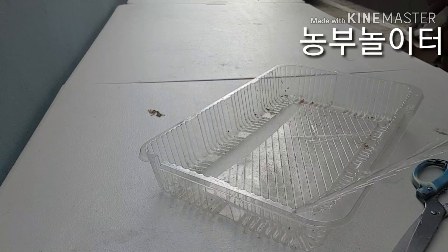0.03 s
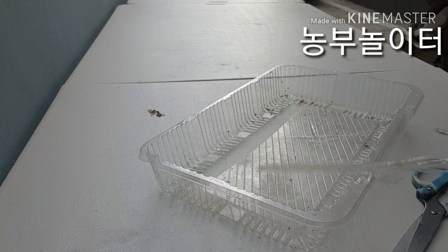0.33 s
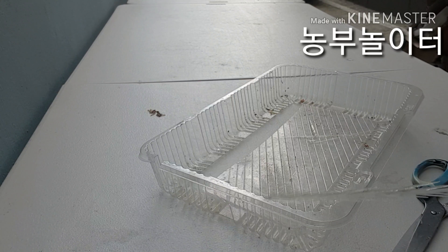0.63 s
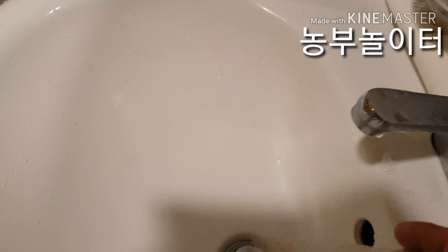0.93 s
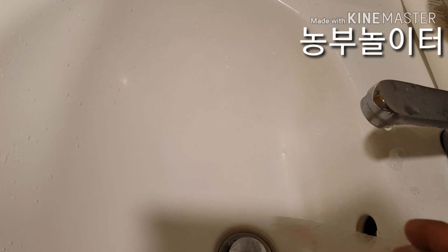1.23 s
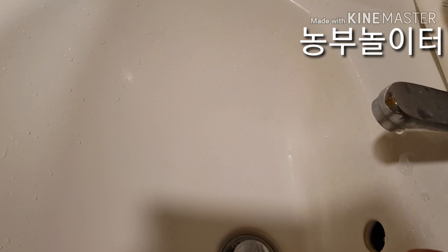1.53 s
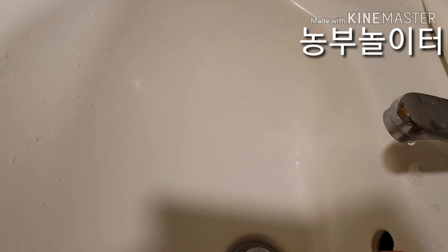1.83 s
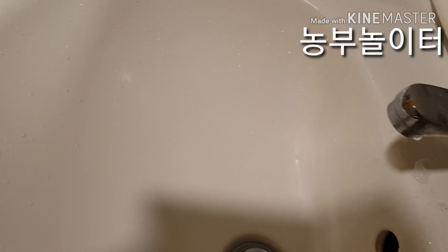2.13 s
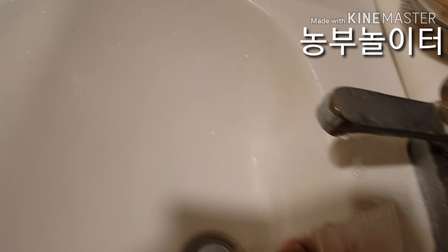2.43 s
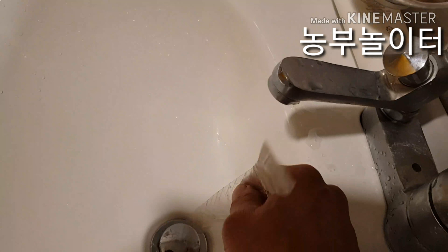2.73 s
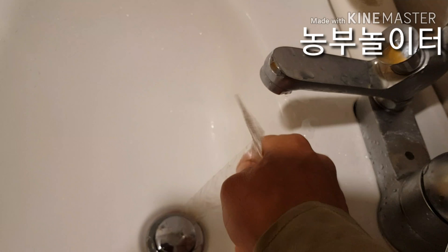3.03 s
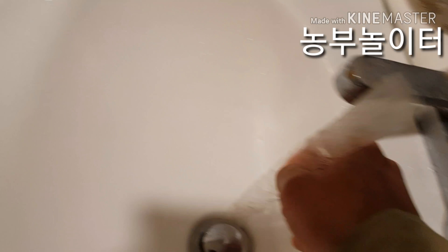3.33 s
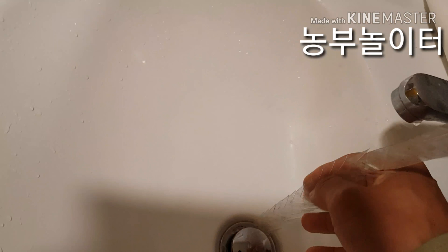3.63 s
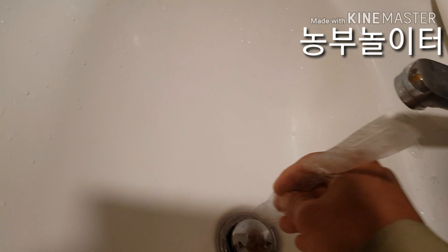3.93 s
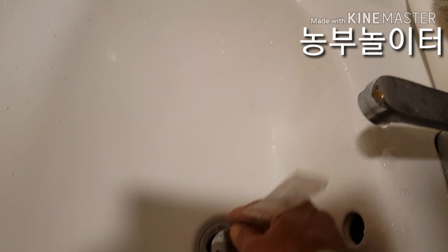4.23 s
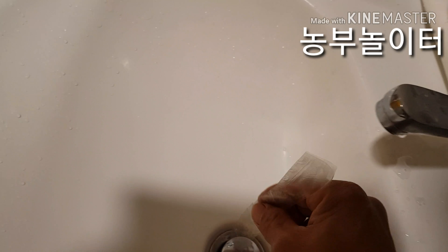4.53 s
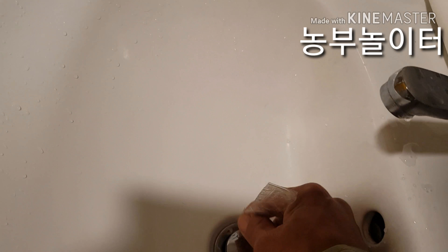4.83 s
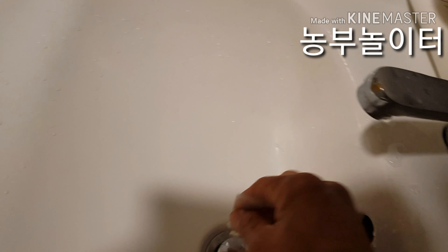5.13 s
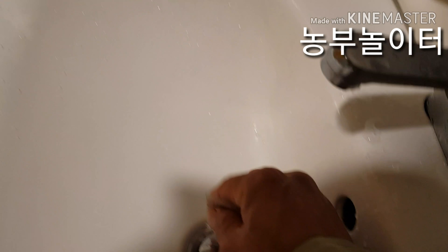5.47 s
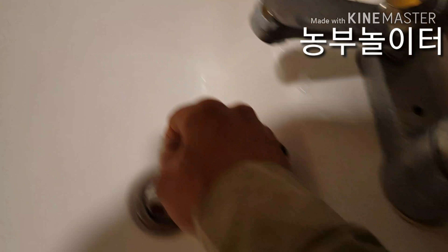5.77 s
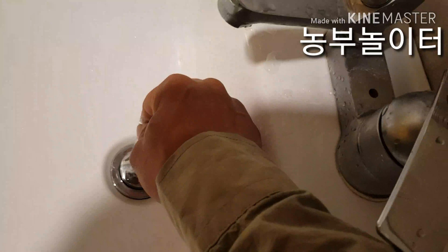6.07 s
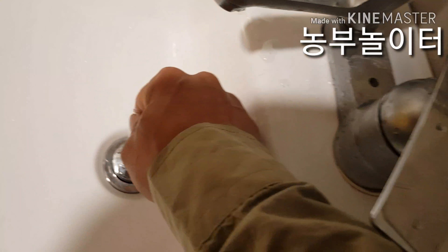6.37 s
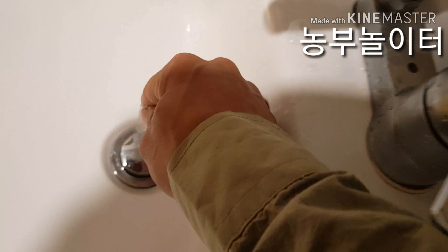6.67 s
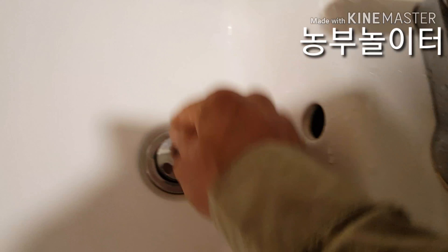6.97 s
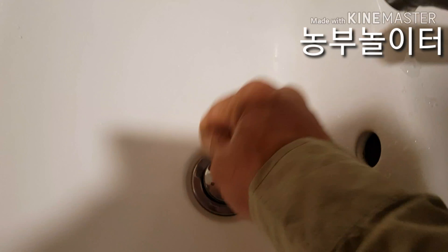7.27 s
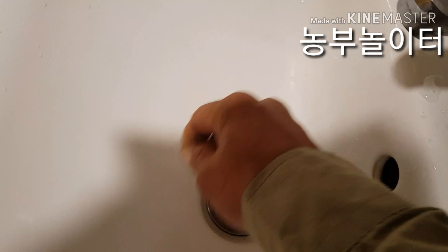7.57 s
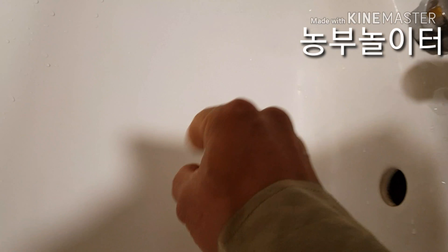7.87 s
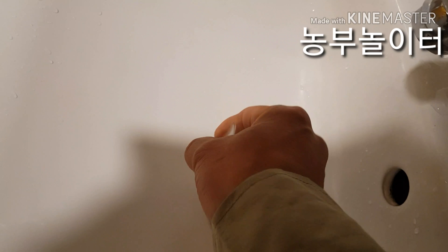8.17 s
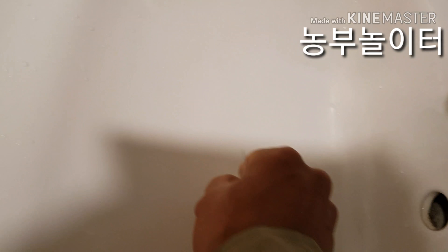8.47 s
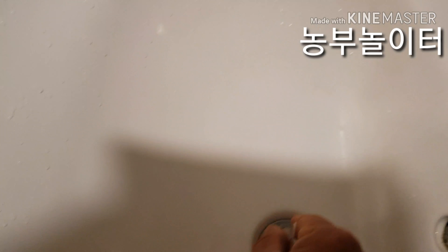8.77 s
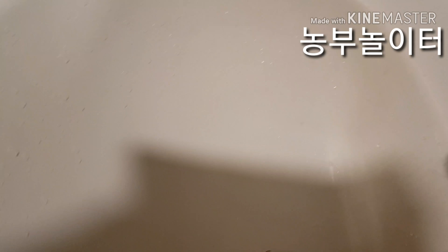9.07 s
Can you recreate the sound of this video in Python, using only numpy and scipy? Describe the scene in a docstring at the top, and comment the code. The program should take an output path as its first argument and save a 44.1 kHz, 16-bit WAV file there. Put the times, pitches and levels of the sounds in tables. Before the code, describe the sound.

A loud low rumble opens and cuts off. After a short silence, a fan hums in a small tiled bathroom while a plastic strip is worked in the sink drain, rubbing, ticking and pinging the metal stopper. A hand softly bumps the close microphone, and the pipe booms once. Later a run of hard scrapes and clacks rings the basin, and a soft swish ends it.

```python
"""A loud low rumble opens the scene and is cut off. After a short silence a fan hums in a small tiled
bathroom, where a plastic strip is worked in the washbasin drain: it rubs, its barbs scrape and tick,
the metal stopper pings, and the moving hand adds soft bumps. At 4.4 s the pipe booms once.
From 6.8 s a run of hard scrapes and clacks against the stopper rings the basin.
At 9.1 s a soft swish ends it."""
import sys
import numpy as np
from scipy import signal
from scipy.fft import rfft, irfft
from scipy.io import wavfile

SR = 44100
rng = np.random.default_rng(int(sys.argv[2]) if len(sys.argv) > 2 else 0)


def generate_wav(signal):
    """Clip the signal to [-1, 1] and save it as 16-bit WAV at the path in sys.argv[1]."""
    frames = np.transpose(np.atleast_2d(signal))
    scaled = np.clip(frames, -1, 1) * 32767
    pcm = np.round(scaled).astype(np.int16)
    wavfile.write(sys.argv[1], SR, pcm)


N = 410130
TIME = np.arange(N) / SR


def amp(db):
    """Decibels to gain."""
    return 10 ** (np.asarray(db) / 20)


def unit(x):
    """Scales to rms 1."""
    return x / np.sqrt(np.mean(x ** 2) + 1e-20)


def unit_energy(response):
    """Scales a stereo impulse response to mean channel energy 1."""
    return unit(response) / np.sqrt(response.shape[1])


def lookup(points, hz):
    """Interpolates a table on a log-frequency axis."""
    f, value = np.transpose(points)
    return np.interp(np.log(hz + 1), np.log(f + 1), value)


def add(mix, start_s, sound):
    """Mixes in a stereo sound."""
    part = mix[:, round(start_s * SR):][:, :sound.shape[1]]
    part += sound[:, :part.shape[1]]


def pan(db):
    """Stereo gains for a left-minus-right (L-R) level."""
    gains = amp(np.array([db, -db]).reshape(2, -1) / 2)
    return gains / np.sqrt(np.mean(gains ** 2, axis=0))


def drift(hz):
    """Random wander of rms 1 and bandwidth hz."""
    t = TIME[::64]
    lowpass = np.exp(-(np.fft.rfftfreq(len(t), t[1]) / hz) ** 2)
    slow = irfft(rfft(rng.standard_normal(len(t))) * lowpass, len(t))
    return np.interp(TIME, t, unit(slow))


def envelope(start_s, attack_s, hold_s, fade_db_per_s):
    """Smooth attack, hold, exponential fade."""
    t = TIME - start_s
    attack = np.sin(np.pi / 2 * np.clip(t / attack_s, 0, 1)) ** 2
    return attack * amp(-fade_db_per_s * np.maximum(t - attack_s - hold_s, 0))


def arch(middle_s, length_s):
    """Parabola from 0 to 1 and back, like the speed of one hand move."""
    return np.maximum(1 - (2 * (TIME - middle_s) / length_s) ** 2, 0)


def convolve(x, response):
    """Applies a stereo impulse response."""
    return signal.oaconvolve(np.atleast_2d(x), response, axes=1)[:, :x.shape[-1]]


# Left-right coherence: f/Hz, correlation
COHERENCE = [(60, 0.98), (150, 0.92), (300, 0.87), (600, 0.56), (1200, 0.048), (2500, 0.065), (6000, 0.052),
             (16000, 0.13)]

def colour(x, spectrum, balance, peaks=()):
    """Gives a stereo pair a spectrum, balance and resonances; the bass is nearly mono."""
    size = x.shape[1]
    hz = np.fft.rfftfreq(size, 1 / SR)
    common, separate = rfft(x)
    coherence = lookup(COHERENCE, hz)
    left = coherence * common + np.sqrt(1 - coherence ** 2) * separate
    peaks_db = sum(db / (1 + (2 * (hz - f) / width_hz) ** 2) for f, width_hz, db in peaks)
    gain = amp(lookup(spectrum, hz) + peaks_db) * pan(lookup(balance, hz))
    return irfft(np.array([left, common]) * gain, size)


def noise(spectrum, balance, peaks=()):
    """Coloured stereo noise of rms 1."""
    return unit(colour(rng.standard_normal((2, N)), spectrum, balance, peaks))


# Rumble spectrum: f/Hz, level/dB (table levels are relative throughout)
RUMBLE_SPECTRUM = [(20, -36.5), (40, -1), (60, -2), (100, -5), (170, -7), (250, -9), (400, -14),
                   (650, -19.5), (1100, -21.5), (1850, -26.5), (2600, -33.5), (3300, -40.5), (8000, -44),
                   (16000, -58)]
# Rumble resonances: f/Hz, width/Hz, boost/dB
RUMBLE_PEAKS = [(56.6, 8.8, 8.2), (95.4, 14, 11.7), (126, 4.6, 2.6), (162.3, 20, 9), (450, 25, 1.8),
                (1300, 120, 2), (2465, 45, 6.7)]

def rumble():
    """Heavy rumble with a brief hiss, a whine that fades and returns, and a late thin band."""
    balance = [(60, -3.5), (400, -4.5), (8000, -4)]
    low = amp(-22) * noise(RUMBLE_SPECTRUM, balance, RUMBLE_PEAKS) * amp(drift(hz=9.8))
    hiss = noise([(1000, -1.5), (3500, -10), (5000, -13), (8000, -15.5), (16000, -14.5)], balance,
                 peaks=[(4860, 300, 5.3), (6980, 600, 5.8)])
    whine = noise([(900, -31), (1300, -18), (1850, -11), (2300, -22.5), (3000, -44)], balance,
                  peaks=[(1860, 38, 4.9), (1680, 95, 6.2), (1240, 85, 13)])
    thin = noise([(2400, -45), (3050, 1), (3300, 7), (3900, -45)], balance)
    spurt = amp(-32.5) * envelope(0.05, attack_s=0.076, hold_s=0.005, fade_db_per_s=129)
    hiss *= spurt + amp(-37.5 - 17.3 * TIME)
    opening = amp(-37.5) * envelope(0, attack_s=0.005, hold_s=0.36, fade_db_per_s=77)
    comeback = amp(-40.5) * arch(middle_s=0.9, length_s=0.16)
    whine *= (opening + comeback) * amp(1.6 * drift(hz=25))
    thin *= amp(-53.5) * arch(middle_s=0.68, length_s=0.37)
    return low + hiss + whine + thin


# Motor lines: f/Hz, level/dB
HUM_LINES = [(59.2, -53), (91.5, -59.5), (118.4, -58.5), (177.6, -50), (236.9, -59), (296.1, -54.5),
             (716.0, -70.5), (823.6, -66)]
# Airflow spectrum: f/Hz, level/dB
AIR_SPECTRUM = [(20, -22), (38, -28), (52, 14.5), (75, -17), (110, -30), (165, 4.5), (230, -12),
                (320, -5.5), (480, -11.5), (850, -13), (1400, -20.5), (2500, -16.5), (3500, -28.5),
                (16000, -45.5)]
# Airflow balance: f/Hz, L-R/dB
AIR_BALANCE = [(60, -4), (110, -3.5), (200, -13.5), (380, -2), (700, -6), (1290, 0), (2380, 5.5), (4400, 4),
               (8120, -5), (15000, -12)]

def fan():
    """Wavering motor hum over moving air."""
    hum = 0
    for hz, db in HUM_LINES:
        phase = 2 * np.pi * hz * TIME + 1.01 * drift(hz=3.4)
        line = unit(np.sin(phase)) * amp(db + 2 * drift(hz=11))
        hum += pan(lookup(AIR_BALANCE, hz)) * line
    return amp(-1.5) * hum + amp(-47) * noise(AIR_SPECTRUM, AIR_BALANCE)


# Bathroom decay: f/Hz, T60/s
ROOM_DECAY = [(150, 1), (1000, 0.37), (4000, 0.32), (9000, 0.2), (16000, 0.2)]

def room(x):
    """Tiled walls: a dense tail whose treble dies first."""
    hz, t, bins = signal.stft(rng.standard_normal((2, SR // 2)), SR, nperseg=256)
    decay = amp(-60 * t / lookup(ROOM_DECAY, hz)[:, None])
    tail = signal.istft(bins * decay, SR, nperseg=256)[1]
    onset = 1 - np.exp(-TIME[:tail.shape[1]] / 0.0014)
    return convolve(x, unit_energy(tail * onset))


# Basin and drain modes: f/Hz, level/dB, T60/s
BASIN_MODES = [(89.4, -1.5, 0.46), (125.4, -10, 0.39), (174, -3, 0.37), (246, -8, 0.4), (306.6, 1, 0.31),
               (322.8, 1, 0.22), (338.4, -2.5, 0.23), (379, -9.5, 0.25), (466.6, -5, 0.14),
               (594.5, -5, 0.2), (647, -3, 0.12), (757, -7.5, 0.089), (837, -3, 0.094), (940, -2.5, 0.08),
               (1009.6, -1.5, 0.14), (1150, -14, 0.15), (1590, -8, 0.11), (1883, -9.5, 0.11),
               (2185, 2, 0.045), (2280, -4, 0.13), (2377, -7.5, 0.089), (2520, -9, 0.059),
               (2730, -6.5, 0.1), (2810, -8.5, 0.12), (3860, -13, 0.25)]
# Balance at the basin: f/Hz, L-R/dB
BASIN_BALANCE = [(60, -7), (110, -4), (200, -14.5), (380, -1.5), (700, -5.5), (1290, -0.5), (2380, 4),
                 (4400, 3), (8120, -7), (15000, -8.5)]
HOLLOW_LOW_HZ, HOLLOW_HIGH_HZ = 280, 360

def basin_ring(favoured_hz=1000, falloff_db_per_oct=0, hollow_db=0):
    """Basin and drain ring; each contact point favours some modes and detunes them slightly."""
    t, ring = TIME[:SR // 4], 0
    for k, (hz, db, t60_s) in enumerate(BASIN_MODES):
        ear_phase = (-1) ** k * np.arccos(lookup(COHERENCE, hz)) * np.array([[-0.5], [0.5]])
        db -= falloff_db_per_oct * abs(np.log2(hz / favoured_hz))
        db += hollow_db * (HOLLOW_LOW_HZ < hz < HOLLOW_HIGH_HZ)
        gain = pan(lookup(BASIN_BALANCE, hz)) * amp(db + rng.uniform(-4.24, 4))
        detune = 1 + 0.009 * rng.uniform(-0.67, 1)
        ring += gain * np.sin(2 * np.pi * hz * detune * t + ear_phase) * amp(-60 * t / t60_s)
    return unit_energy(ring * (1 - np.exp(-t / 0.00035)))


# Light slides, to and fro: middle t/s, length/s, level/dB, push on basin/dB, sizzle/dB
SLIDE_STROKES = [(1.2, 0.36, -45, -10, -4), (1.437, 0.2, -50.5, 4, -2), (1.774, 0.26, -49.5, 5, -2),
                 (2.01, 0.22, -55, -1, 2), (2.357, 0.23, -54, 1, 1.5), (2.73, 0.44, -51, 12, -3),
                 (3.156, 0.9, -55, 11.5, -1), (3.52, 0.24, -50, 3, -3), (3.937, 0.94, -50, 10.5, 0.5),
                 (4.268, 0.3, -46, 12.5, 1), (4.764, 0.41, -50.5, 8, 3), (5.06, 0.28, -56, -10, 5),
                 (5.227, 0.27, -50, 5, 0), (5.47, 0.39, -53.5, -11, 0), (5.96, 0.34, -57, -7, 3),
                 (6.267, 0.35, -54.5, -7, 2), (6.52, 0.34, -60, -10, 2), (6.814, 0.2, -44.5, 12, 0),
                 (7.22, 0.67, -42, 4.5, 0), (7.732, 0.87, -46.5, 3.5, 2), (8.19, 0.17, -52.5, -1, -1.5),
                 (8.44, 0.48, -52.5, -7, 0), (8.76, 0.32, -55.5, -4, 1), (9.042, 0.27, -53, -8, 2)]
SPEED_EXPONENT, RESTING_DB, SIZZLE_HZ = 0.97, -61, 8000

def sliding():
    """Friction, push and sizzle gains grow with speed; the strip never lies quite still."""
    friction, push, sizzle = amp(RESTING_DB) ** 2, 0, amp(RESTING_DB) ** 2
    for middle_s, length_s, db, push_db, sizzle_db in SLIDE_STROKES:
        power = amp(db) ** 2 * arch(middle_s, length_s) ** (2 * SPEED_EXPONENT)
        friction += power
        push += power * amp(push_db) ** 2
        sizzle += power * amp(sizzle_db) ** 2
    return np.sqrt(friction), np.sqrt(push), np.sqrt(sizzle)


def rubbing(friction, push, sizzle):
    """The strip slides lightly along the drain wall: a nearly smooth hiss that rings the basin."""
    ring = basin_ring(favoured_hz=720, falloff_db_per_oct=2.7)
    grain = rng.standard_normal((2, N)) * amp(1.54 * drift(hz=60) + 0.44 * drift(hz=250))
    spectrum = [(200, 6.5), (1200, 5), (2300, 0.5), (3400, 1.5), (5000, -2), (7500, -3.5),
                (11000, -6.5), (16000, -9.5)]
    balance = [(2000, 0), (4500, 2.5), (8000, -4.5), (15000, -15)]
    peaks = [(5050, 240, 3.4), (6230, 140, 1.4), (10300, 970, 2.5), (12400, 1600, 4.9)]
    hiss = unit(colour(grain, spectrum, balance, peaks))
    top = signal.sosfiltfilt(signal.butter(2, SIZZLE_HZ, "high", fs=SR, output="sos"), hiss)
    direct = amp(-3) * ((hiss - top) * friction + top * sizzle)
    direct += amp(-11) * convolve(grain[1] * push, ring)
    return direct + amp(-9.5) * room(direct)


# Strip snap spectrum: f/Hz, level/dB
SNAP_SPECTRUM = [(60, -2), (200, -0.5), (500, 2), (1000, 1.5), (2300, -4), (3200, 2.5), (5000, 2),
                 (7000, 2), (11000, 0.5), (14000, -3), (16000, -3.5)]
# Strip resonances: f/Hz, width/Hz, boost/dB
SNAP_PEAKS = [(2295, 500, 11.5), (2770, 120, 3), (3240, 530, -1), (3870, 120, 2.5), (4290, 180, 2.5),
              (4820, 180, 6.5), (6180, 120, 1), (7730, 220, 2), (11100, 250, 2), (12000, 220, 5),
              (12900, 200, 2)]

def snap(bowl_s, crack_db, treble_db_per_oct=0):
    """One slip: a crack whose treble runs ahead along the strip, scattered by the bowl."""
    size, delay_s = 2048, 0.0009
    t, hz = TIME[:size], np.fft.rfftfreq(size, 1 / SR)
    crack = irfft(np.exp(-2j * np.pi * delay_s * hz * (1 - hz / SR)), size)
    scatter = unit_energy(rng.standard_normal((2, size)) * np.exp(-t / bowl_s))
    sound = np.roll(amp(crack_db) * crack + scatter, 32, axis=1)
    spectrum = [(f, db + treble_db_per_oct * np.log2(max(f / 3000, 1))) for f, db in SNAP_SPECTRUM]
    return unit_energy(colour(sound, spectrum, BASIN_BALANCE, SNAP_PEAKS))


def crackle(sizzle, max_catches_per_s=450):
    """Single barbs catch and snap, far more often under hard rubbing."""
    pressure = sizzle / amp(-41.5)
    catches = rng.random(N) < np.minimum(pressure, 1) ** 3 * max_catches_per_s / SR
    sizes = amp(-24.5 + 2.1 * rng.uniform(-0.89, 1, N))
    return convolve(catches * pressure * sizes, pan(-9) * snap(bowl_s=0.003, crack_db=-5))


# Gritty stretches: middle t/s, length/s, level/dB
GRIT_SPANS = [(1.22, .2, -56), (4.258, 0.22, -48), (4.745, 0.22, -48.5), (5.24, 0.17, -50.5),
              (6.25, .22, -62.5)]
# Tick notes: f/Hz, level/dB
GRIT_NOTES = [(4980, 0.5), (6200, -9), (8000, -8), (10650, 1), (11300, -5), (12600, -3), (14200, -9)]
TRAINS_PER_NOTE, TRAIN_TICKS_PER_S, TICK_T60_S = 3, 130, 0.0054

def grit():
    """Tiny barbs tick over the wet rim, so densely that they blur."""
    t, ticks = TIME[:SR // 25], np.zeros((2, N))
    for hz, db in GRIT_NOTES * TRAINS_PER_NOTE:
        onsets = rng.integers(0, N, round(TRAIN_TICKS_PER_S * N / SR))
        train = np.zeros(N)
        train[onsets] = amp(2 * np.minimum(rng.exponential(1, len(onsets)), 3))
        detune = 1 + 0.022 * rng.uniform(-0.92, 1)
        phase = 2 * np.pi * (hz * detune * t + rng.random((2, 1)))
        tick = np.sin(phase) * amp(db - 60 * t / TICK_T60_S)
        ticks += convolve(train, pan(lookup(BASIN_BALANCE, hz)) * tick)
    direct = unit(ticks) * sum(amp(db) * arch(t_s, length_s) for t_s, length_s, db in GRIT_SPANS)
    return direct + amp(-8.5) * room(direct)


def slips(per_s, spread_db):
    """Friction: tiny uneven slips, each a brief crackle, over a smooth hiss."""
    sizes = amp(spread_db * np.minimum(rng.exponential(1, N), 4))
    sizes *= rng.random(N) < per_s / SR
    power = signal.lfilter([1], [1, -np.exp(-1 / (0.00028 * SR))], sizes ** 2)
    return unit(np.sqrt(power / power.mean() + 1) * rng.standard_normal((2, N)))


# Hard scrapes: peak t/s, rise/s, fall/s, hiss level/dB, basin level/dB, favoured f/Hz, hollow note/dB
SCRAPE_STROKES = [(1.168, 0.0088, 0.016, -49.5, -40.5, 850, 6), (1.389, .006, 0.021, -57.5, -42, 850, -2),
                  (1.837, 0.015, 0.017, -59, -53, 640, -6), (2.34, 0.027, 0.021, -68, -51, 600, -22),
                  (2.415, 0.036, 0.014, -65, -44, 600, -14), (2.696, 0.016, 0.014, -39, -38, 392, -2),
                  (3.857, 0.04, 0.053, -75, -47.5, 804, -9), (4.672, 0.028, 0.037, -48.5, -41.5, 790, -5),
                  (4.75, 0.037, 0.048, -47, -42, 676, -5), (5.23, 0.057, 0.12, -54, -46.5, 920, -9),
                  (5.605, 0.021, 0.05, -56, -41, 820, -8), (6.802, 0.015, 0.035, -40.5, -35, 830, 2),
                  (6.943, 0.022, 0.022, -33.5, -28.5, 600, -1), (6.952, 0.0077, 0.019, -38, -37, 2100, 3),
                  (7.035, 0.014, 0.027, -37.5, -29.5, 1110, -4.5),
                  (7.084, 0.012, 0.025, -33.5, -28.5, 1070, 0.5), (7.168, 0.015, 0.024, -34, -28, 760, 5),
                  (7.236, 0.0084, 0.011, -24.5, -26, 720, -6), (7.286, 0.03, .031, -44, -40.5, 2000, 0),
                  (7.375, 0.033, 0.024, -40.5, -36, 750, 3), (7.52, 0.015, 0.022, -29.5, -35.5, 328, 6),
                  (7.551, 0.017, 0.027, -33.5, -30.5, 450, 1), (7.61, 0.0098, 0.01, -31, -47, 1500, 14),
                  (7.643, 0.011, 0.013, -33.5, -31, 795, 6), (7.706, 0.014, 0.014, -39, -27, 1020, 6),
                  (7.735, 0.0085, 0.021, -32.5, -32, 596, -1), (7.806, 0.018, 0.02, -49, -39, 2240, -3),
                  (7.826, 0.038, 0.053, -61, -37.5, 150, 4)]

def scraping():
    """Short hard strokes: barbs chatter over the rim, each contact point with its own colour."""
    grain = slips(per_s=900, spread_db=4.5)
    hiss, basin = np.zeros((2, N)), np.zeros((2, N))
    for peak_s, rise_s, fall_s, hiss_db, basin_db, hz, hollow_db in SCRAPE_STROKES:
        span = slice(round(peak_s * SR) - SR // 4, round(peak_s * SR) + SR // 2)
        t = TIME[span] - peak_s
        width_s = np.where(t < 0, rise_s, fall_s)
        stroke = np.exp(-np.minimum((t / width_s) ** 2, 20)) * grain[:, span]
        hiss[:, span] += amp(hiss_db) * convolve(stroke[0], snap(bowl_s=0.0027, crack_db=-4))
        ring = basin_ring(favoured_hz=hz, falloff_db_per_oct=6.2, hollow_db=hollow_db)
        basin[:, span] += amp(basin_db) * convolve(stroke[1], ring)
    return amp(0.5) * hiss + amp(-2.5) * room(hiss) + basin


# Knocks in the drain: t/s, level/dB, f/Hz
DRAIN_KNOCKS = [(1.159, -38, 440), (1.166, -41, 800), (1.38, -41, 955), (1.388, -39, 605),
                (1.833, -28.5, 606.5), (1.85, -38, 617), (2.335, -45, 596), (2.691, -40, 602),
                (2.698, -52, 326), (3.244, -39, 1550), (3.256, -32.5, 1400), (3.282, -38, 1460),
                (3.458, -39.5, 1390), (3.614, -37.5, 1500), (5.576, -38, 795), (6.791, -36, 885),
                (7.023, -30.5, 1010), (7.086, -22.5, 1013), (7.166, -29, 562), (7.234, -16, 588),
                (7.237, -21.5, 1605), (7.717, -28, 1025), (7.72, -27.5, 592), (7.7233, -22, 303)]

def knocking():
    """Soft blows: the bent strip gives a short dead note; the drain rings on near that pitch."""
    direct, t = np.zeros((2, N)), TIME[:SR // 10]
    for start_s, db, hz in DRAIN_KNOCKS:
        note = np.sin(2 * np.pi * hz * t) * np.exp(-t * hz / 9.6)
        add(direct, start_s, amp(db - 4) * pan(lookup(BASIN_BALANCE, hz)) * note)
        add(direct, start_s, amp(db + 14.5) * basin_ring(favoured_hz=hz, falloff_db_per_oct=5.9))
    return direct + amp(-19) * room(direct)


# Stopper rim pings: t/s, level/dB, f/Hz, T60/s
RIM_PINGS = [(1.824, -52, 5320, .1), (2.69, -43, 4670, 0.066), (3.283, -44, 3900, .1),
             (7.718, -29, 2290, 0.07), (7.927, -43, 2280, 0.089)]

def pinging():
    """A barb flicks the stopper's rim: a brief, slightly unsteady metal note."""
    direct, t = np.zeros((2, N)), TIME[:SR // 5]
    for start_s, db, hz, t60_s in RIM_PINGS:
        phase = 2 * np.pi * hz * t + 0.69 * drift(hz=120)[:len(t)]
        note = np.sin(phase) * amp(db - 60 * t / t60_s)
        add(direct, start_s, pan(lookup(BASIN_BALANCE, hz)) * note)
    return direct + amp(-20) * room(direct)


# Clicks and clacks: t/s, level/dB, basin ring/dB, L-R/dB, room send/dB, treble tilt/(dB/oct)
CLICK_HITS = [(1.831, -47, 14.5, -3, -6, 0), (2.689, -26.5, 1, 0, -3, 0), (2.852, -31, -2, 2, -8, -0.5),
              (3.243, -35.5, -18, 1, -12, 0), (3.2555, -30.5, -22, 0, 0, 1.5),
              (3.281, -28.5, -4, -1, -2.5, 0), (3.518, -41.5, 7, -6, 2, 0),
              (3.611, -34.5, -15, -4, -5, 2.5), (3.956, -35, 0, -7, -2, -1),
              (4.1444, -39.5, -14, -15, 0, 2), (4.194, -46, -3, -5.5, -8, 1), (4.227, -39, 6, -8, -15, -2),
              (4.318, -27.5, -7, -4, -7, 4), (4.637, -40, -8, -7, -12, 0), (4.6678, -40, -8, -3, -6, 1),
              (4.825, -38.5, -8, 6, -7, 0), (4.838, -42, -3, 1, -3, -1), (5.269, -32.5, -8, -4, -14, 0.5),
              (5.322, -37.5, -1, -4, -9, 1), (6.183, -44.5, -16, -4, 3, -1), (6.268, -35, -26, -3, -1, 5),
              (6.9335, -33, -17, -6, -5, -1), (6.9445, -25, -7, -6, -5, 0), (7.083, -19, -24, -8, -6, 1.5),
              (7.1683, -20.5, 4, -13, -11, 2), (7.234, -17.5, -25, -9, -3, 1),
              (7.4077, -23, -27, -4, -8, 4.5), (7.494, -38, 9, -5.5, -7, -3),
              (7.512, -27.5, -15, -11, -6, 1), (7.603, -26, -17, -8, 0, 1.5), (7.637, -30, -10, -6, -9, -5),
              (7.715, -9.5, -7.5, -2, -7, 3.5), (7.724, -18, -19, -2, -5, 0), (7.798, -31, 1, 0, -1, -5),
              (7.8125, -32.5, 7.5, 10, -4, -6), (7.926, -32, -20, -4, -9, 1),
              (8.932, -39.5, -33, -3, -2, 2), (8.98, -42.5, -12, -2.5, -7, 0)]

def clicking():
    """Barbs snap free and the stopper clacks on its seat."""
    direct, to_room = np.zeros((2, N)), np.zeros((2, N))
    for start_s, db, basin_db, pan_db, room_db, tilt in CLICK_HITS:
        crack = amp(db + 17.5) * pan(pan_db) * snap(bowl_s=0.0045, crack_db=-7.5, treble_db_per_oct=tilt)
        add(direct, start_s, crack)
        add(direct, start_s, amp(db + basin_db + 16.5) * basin_ring())
        add(to_room, start_s, amp(room_db) * crack)
    return direct + room(to_room)


# Soft bumps: middle t/s, length/s, level/dB
HAND_BUMPS = [(3.007, 0.78, -48.5), (4.42, 0.22, -42), (4.737, 0.44, -42.5), (5.078, 0.078, -38)]

def handling():
    """The moving hand jostles the microphone."""
    jostle = sum(amp(db) * arch(t_s, length_s) for t_s, length_s, db in HAND_BUMPS)
    spectrum = [(20, -41), (45, 23), (90, -16), (130, -21), (300, -19), (2000, -80)]
    return noise(spectrum, balance=[(60, -3)]) * jostle


# Pipe notes: f/Hz, level/dB, hold/s, fade/(dB/s)
PIPE_NOTES = [(148.4, -23, 0.059, 227), (169.7, -31, 0.2, 300)]
# Pipe rasp spectrum: f/Hz, level/dB
RASP_SPECTRUM = [(30, -17), (105, 1), (175, 9), (300, -5.5), (550, -9), (950, -12.5), (1400, -17),
                 (2300, -19.5), (3500, -27), (8000, -39.5), (16000, -40)]

def boom(start_s=4.368, attack_s=0.035):
    """The drain pipe shudders: a rasp and two hollow low notes that beat; the upper holds longer."""
    tone = 0
    for hz, db, hold_s, fade_db_per_s in PIPE_NOTES:
        phase = 2 * np.pi * hz * (TIME - start_s) + 0.28 * drift(hz=50)
        tone += amp(db) * unit(np.sin(phase)) * envelope(start_s, attack_s, hold_s, fade_db_per_s)
    rasp = noise(RASP_SPECTRUM, BASIN_BALANCE)
    rasp *= envelope(start_s, attack_s=0.033, hold_s=0.027, fade_db_per_s=114)
    return pan(-5) * tone * amp(1.7 * drift(hz=60)) + amp(-25.5) * rasp


# Swish spectrum: f/Hz, level/dB
SWISH_SPECTRUM = [(60, -2), (200, -4), (500, -10), (900, -3), (1500, -5), (2400, -9.5), (3400, -11.5),
                  (4800, -12), (7000, -16.5), (16000, -20)]
# Rising resonances: start f/Hz, glide/(Hz/s), width/Hz, start boost/dB, fade/(dB/s)
SWISH_GLIDES = [(770, 700, 230, 13.5, 67), (1750, 8400, 700, 6.5, 4)]

def swish(start_s=9.06):
    """A smooth wipe starts hollow, then rises and brightens as it speeds up."""
    hz, t, bins = signal.stft(noise(SWISH_SPECTRUM, AIR_BALANCE), SR, nperseg=512)
    age_s = np.maximum(t - start_s, 0)
    tilt_db_per_oct = np.minimum(21 * age_s - 1.6, 1.3)
    db = np.log2(np.maximum(hz, 300) / 1500)[:, None] * tilt_db_per_oct
    for start_hz, glide_hz_per_s, width_hz, boost_db, fade_db_per_s in SWISH_GLIDES:
        offset_hz = hz[:, None] - start_hz - glide_hz_per_s * age_s
        db += np.maximum(boost_db - fade_db_per_s * age_s, 0) / (1 + (2 * offset_hz / width_hz) ** 2)
    wipe = signal.istft(bins * amp(db), SR, nperseg=512)[1][:, :N]
    return amp(-36.5) * wipe * envelope(start_s, attack_s=0.052, hold_s=0.079, fade_db_per_s=147)


RUMBLE_END_S, BATHROOM_START_S = 0.933, 1.079

def scene():
    """Rumble, short silence, bathroom."""
    friction, push, sizzle = sliding()
    strip = rubbing(friction, push, sizzle) + crackle(sizzle) + grit()
    strip += scraping() + clicking() + knocking() + pinging() + swish()
    bathroom = fan() + strip + boom() + handling()
    cut_off = np.clip((RUMBLE_END_S - TIME) / 0.012, 0, 1)
    fade_in = np.clip((TIME - BATHROOM_START_S) / 0.038, 0, 1)
    return rumble() * cut_off + bathroom * fade_in


def record(dry):
    """Band limit at 15.75 kHz."""
    lowpass = signal.firwin(255, 15750, window=("kaiser", 8), fs=SR)
    return signal.oaconvolve(dry, lowpass[None], "same", axes=1)


dry = scene()
out = record(dry)
generate_wav(out)
```